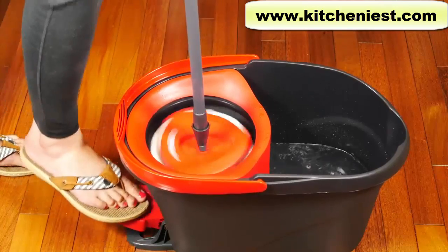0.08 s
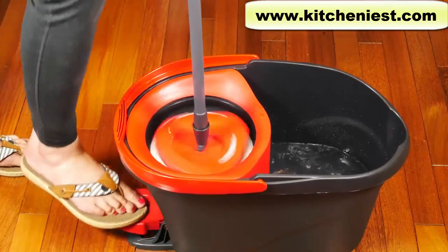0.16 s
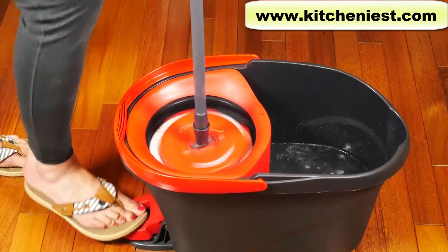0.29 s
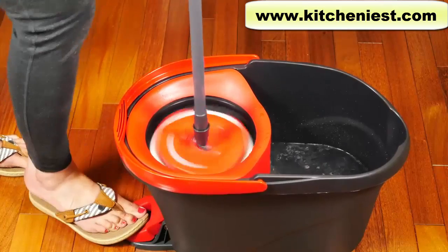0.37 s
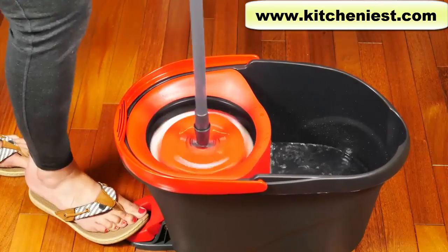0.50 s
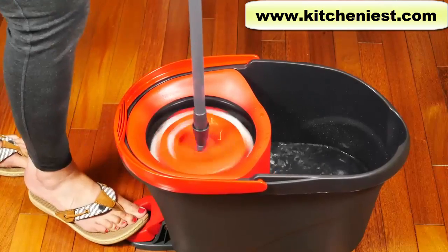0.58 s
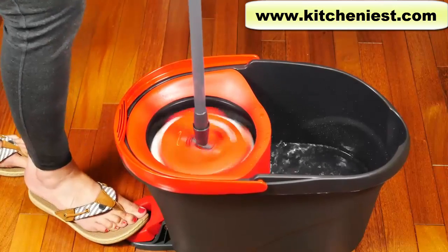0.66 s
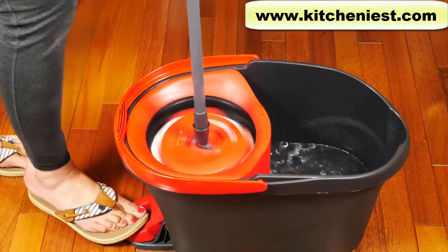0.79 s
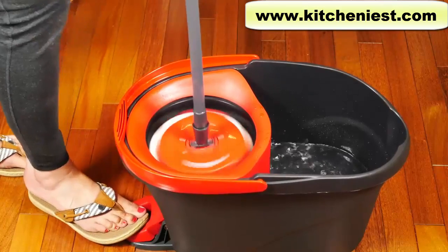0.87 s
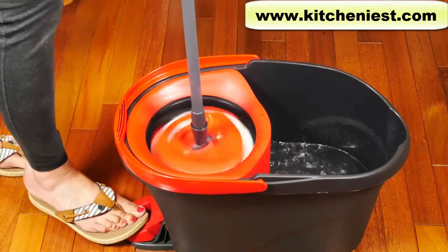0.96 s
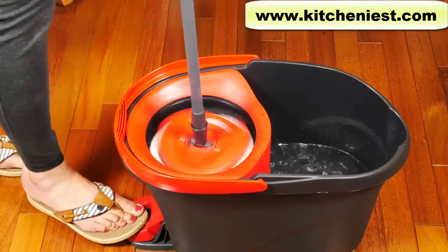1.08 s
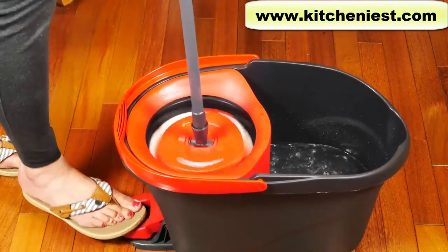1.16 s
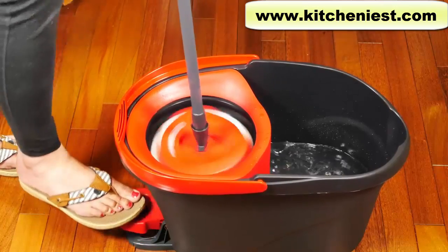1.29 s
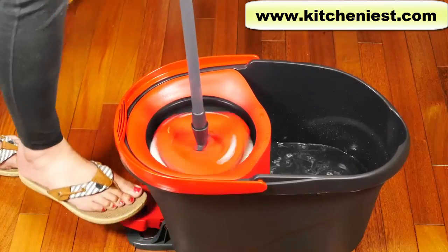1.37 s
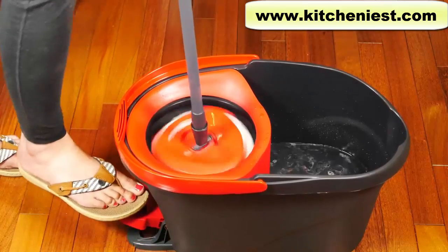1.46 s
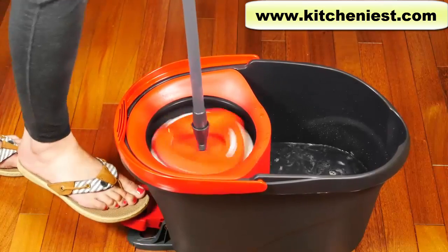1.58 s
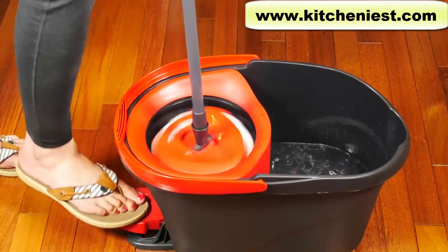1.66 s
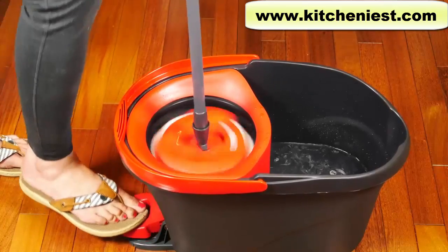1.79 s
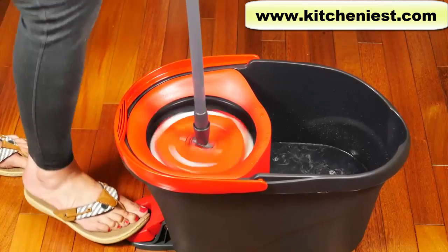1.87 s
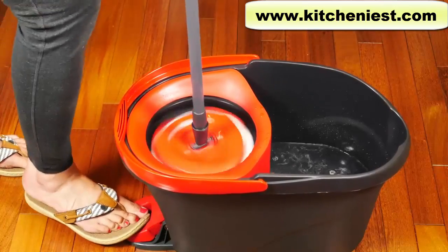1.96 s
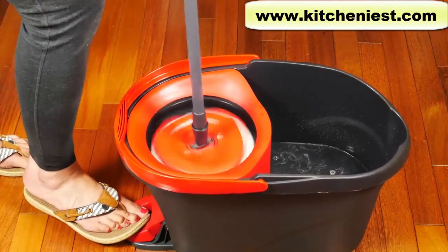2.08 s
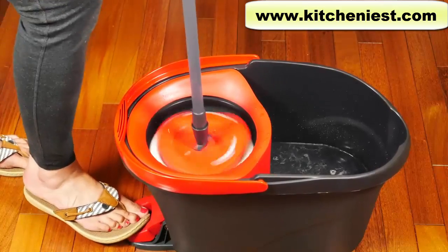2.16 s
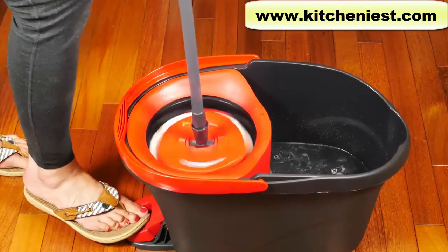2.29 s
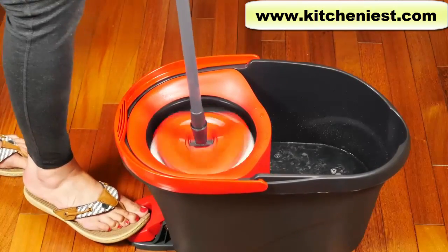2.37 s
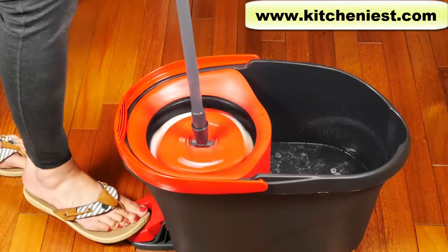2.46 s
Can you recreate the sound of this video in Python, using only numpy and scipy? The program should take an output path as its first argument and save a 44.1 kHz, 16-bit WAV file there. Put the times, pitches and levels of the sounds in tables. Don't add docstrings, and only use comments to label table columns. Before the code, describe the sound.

A spin-mop bucket is pumped by foot. From 0.13 seconds plastic teeth chatter faster and louder, ending near 0.37 in a hard, bouncing clack with rattle and low floor thump. The basket whirrs throughout with throbbing and faint water hiss. From 1.1 to 1.5 the rising pedal scrapes with small squeaks. Fainter chatter from 1.7 ends in a bright clack at 1.91; whirring continues, with a faint knock near 2.16.

```python
import sys
import numpy as np
from scipy import signal
from scipy.fft import rfft, irfft
from scipy.io import wavfile
from scipy.ndimage import uniform_filter1d

SR = 44100
rng = np.random.default_rng(int(sys.argv[2]) if len(sys.argv) > 2 else 0)


def convert_level_to_amplitude(level_db):
    exponent = np.asarray(level_db, float) / 20
    return 10 ** exponent


def pcm_store(signal):
    levels = np.round(np.clip(np.atleast_2d(signal), -1, 1) * 32767)
    wavfile.write(sys.argv[1], SR, levels.astype(np.int16).T)


N = 110250

# start in seconds, level in dB.
TOOTH_BLOWS = [(.132, -32), (.149, -32), (.166, -30), (.183, -26), (.199, -24), (.215, -23), (.229, -22),
               (.244, -24), (.257, -22), (.270, -24), (.282, -22), (.294, -22), (.305, -22), (.316, -20),
               (.327, -20), (.337, -17), (.347, -20), (.357, -18), (1.714, -35), (1.728, -34), (1.746, -33),
               (1.765, -34), (1.783, -34), (1.798, -35), (1.812, -32), (1.827, -32), (1.841, -31),
               (1.854, -29), (1.866, -28), (1.879, -22), (1.891, -23)]
# start in seconds, level in dB.
GEAR_KNOCKS = [
    (0.095, -35),
    (.766, -36.5),
    (.806, -34),
    (0.89, -40),
    (.932, -34),
    (1.17, -34.5),
    (1.207, -35),
    (1.615, -36),
]
# start in seconds, peak in dB, brightness in dB, thump in dB.
STOP_BLOWS = [(.229, -27, 4, -23), (0.3624, -6, 6.5, -15.5), (0.3641, -4.5, -1, -33),
              (0.3815, -3.5, -3, -28), (.368, -11, 5, -25), (0.3748, -10.5, -4, -13),
              (1.9024, -21.5, -1, -35), (1.9084, -5, 12.5, -21), (1.9099, -8, -3, -18),
              (1.9165, -15.5, -1.5, -30), (1.9327, -17, 0, -30), (1.929, -17, -4, -40),
              (2.164, -29, -2, -14)]
# start in seconds, joist level in dB, board level in dB.
FLOOR_THUMPS = [
    (0.366, -27.5, -29),
    (1.913, -22, -27.5),
]
# start in seconds, level in dB, decay in seconds.
SHAKEN_PARTS = [
    (0.362, -22.5, 0.043),
    (0.381, -24.5, 0.0067),
    (1.9022, -23, 0.009),
    (1.906, -25, 0.021),
    (1.927, -27.5, 0.015),
]

# frequency in Hz, level in dB, T60 in seconds.
PEDAL_MODES = [(370, -11, 0.0073), (458, -5.5, 0.023), (620, -7.5, 0.015), (809, -4.5, 0.031),
               (979, 0.5, 0.019), (1308, -10, 0.036), (1570, -8, 0.019), (2945, -3, 0.025)]
STOP_MODES = [(369.2, 0, 0.067), (479, -13.5, 0.034), (840, -18.5, 0.02), (1062, -0.5, 0.039),
              (1243, -11, 0.036), (1480, -6.5, 0.029), (1852, -8, 0.025), (2130, -14, .012),
              (2586, -9, 0.033), (2877, 0, 0.025), (3320, -6, 0.0089), (3520, -9.5, 0.022),
              (4820, -10, 0.012), (5170, -16, 0.019)]
FLOOR_MODES = [(27.85, -5, 1), (48.6, -15, 0.15), (59.3, -8, 1), (105.3, 0.5, 0.32), (175, -18, .06)]
# centre in Hz, width in Hz, level in dB.
BUCKET_PEAKS = [(423, 84, 5.5), (815, 54, 2.5), (1006, 95, -2), (1405, 320, -3.5), (1940, 630, -10),
                (2594, 255, -11), (4760, 430, -21)]
FREEWHEEL_PEAKS = [(430, 58, 3), (563, 81, 5.5), (806, 42, 3.5), (1040, 76, 7), (1500, 38, 8.5),
                   (2000, 250, -8), (2505, 83, -2), (4960, 810, -3.5)]
SHAKEN_PEAKS = [(373, 55, 2), (1080, 260, -7.5), (1515, 105, -1.5), (1840, 83, -8.5), (2900, 260, -2),
                (4700, 360, -9)]
JOIST_PEAKS = [(25.8, 11.5, 2.5), (55.3, 1.6, 4), (104, 7.9, -7)]
# frequency in Hz, level in dB.
HISS_SPECTRUM = [(60, -24), (110, -11.5), (250, -9.5), (1000, -11), (2700, -16.5), (3700, -22),
                 (7600, -23.5), (10500, -34), (15500, -36)]
SCRAPE_SPECTRUM = [(88, -41), (150, -6.5), (274, -10), (1510, -9), (2060, -15), (8830, -20.5), (15500, -61)]
SHAKE_SPECTRUM = [(200, -17), (400, 2), (1000, 2.5), (2800, 8.5), (3900, 3), (5800, -11.5), (9000, -14),
                  (11000, -32)]
RUMBLE_SPECTRUM = [(4.7, -21), (8.0, 0), (41, -7.5), (66, -6), (90, -28), (120, -44), (200, -120)]
AIR_SPECTRUM = [(60, -24), (440, -8.5), (1500, -31), (9000, -31), (10500, -42), (14000, -33.5),
                (16000, -64)]
MIC_RESPONSE = [(20, -2), (9000, 4), (10500, 14), (12000, -2), (15000, -24), (16000, -30)]

# time in seconds, speed in turns per second, whirr in dB, wobble in dB,
# hiss of flung water in dB.
BASKET_SPIN = [(0, 19, -39.5, -65, -53), (.12, 13.4, -54, -48, -55), (.33, 21, -39, -36.5, -37),
               (.52, 12.6, -47, -44.5, -42.5), (.62, 20.8, -48.5, -45, -42.5), (.8, 14.6, -45, -40, -45.5),
               (1.06, 15.4, -46, -37.5, -47.5), (1.12, 16, -46.5, -42.5, -49),
               (1.45, 12, -49.5, -54, -52.5), (1.57, 14.4, -55, -61, -52.5), (1.62, 16, -46, -55, -60),
               (1.69, 12.6, -49.5, -48, -58), (1.88, 17.5, -44.5, -44, -43.5), (2.05, 15.8, -45, -45, -44),
               (2.25, 15.1, -45.5, -38.5, -48), (2.4, 16.2, -47.5, -45, -49.5), (2.5, 16, -47, -50, -49.5)]
# time in seconds, scrape level in dB.
PEDAL_RISE = [
    (1.1, -63),
    (1.14, -46.5),
    (1.18, -38),
    (1.23, -41.5),
    (1.28, -39),
    (1.38, -41),
    (1.45, -43),
    (1.48, -52),
    (1.6, -70),
]
# start in seconds, length in seconds, level in dB.
GUIDE_RUBS = [
    (0.176, 0.21, -51),
    (1.712, 0.084, -57),
    (1.86, 0.047, -47.5),
    (2.3, .1, -60),
    (2.45, .06, -67),
    (2.03, 0.091, -67),
]
# start in seconds, length in seconds, level in dB.
AXLE_SQUEAKS = [
    (1.13, 0.026, -47.5),
    (1.24, 0.056, -43),
    (1.37, 0.097, -52.5),
    (1.6, 0.074, -53.5),
]
# peak in seconds, level in dB, rise in seconds, fall in seconds.
SPRAY_BURSTS = [
    (.45, -52, 0.12, 0.077),
    (.498, -56, .002, 0.028),
    (.83, -53.5, 0.0052, 0.011),
]


def rack():
    start, db = np.transpose(TOOTH_BLOWS)
    push = uniform_filter1d(blows(start, db, scatter_s=0.0061, scatter_db=-23), size=12)
    start, db = np.transpose(GEAR_KNOCKS)
    soft = uniform_filter1d(blows(start, db, scatter_s=0.011, scatter_db=-12), size=24)
    teeth = convert_level_to_amplitude(0.5) * shell(ring(push, PEDAL_MODES, 0.91))
    return teeth + convert_level_to_amplitude(-4.5) * shell(ring(soft, PEDAL_MODES, 0.92))


def clacks():
    start, peak, bright, thump = np.transpose(STOP_BLOWS)
    crackle_db = -21
    dull = uniform_filter1d(blows(start, peak - bright, 0.0041, crackle_db), size=10)
    sharp = blows(start, peak + bright, 0.00077, crackle_db)
    low = uniform_filter1d(blows(start, peak + thump, 0.0016, crackle_db), size=24)
    body = convert_level_to_amplitude(-15) * ring(dull + convert_level_to_amplitude(-7.5) * sharp, STOP_MODES)
    click = convert_level_to_amplitude(3.5) * uniform_filter1d(uniform_filter1d(sharp, size=4), size=3)
    return body + click + convert_level_to_amplitude(10.5) * shell(ring(low, PEDAL_MODES, 0.76))


def shakes():
    t = np.arange(N) / SR
    env = sum(convert_level_to_amplitude(db) * (t > s) * np.exp(-np.maximum(t - s, 0) / decay) for s, db, decay in SHAKEN_PARTS)
    rattle = env * grit(1400, 2.3)
    tone = colour(rattle, SHAKE_SPECTRUM) + convert_level_to_amplitude(-3.0) * peaks(rattle, SHAKEN_PEAKS)
    return convert_level_to_amplitude(-3.0) * rms(rattle) * tone


def thumps():
    start, joist_db, board_db = np.transpose(FLOOR_THUMPS)
    joist = uniform_filter1d(blows(start, joist_db, .004, -60), size=150)
    board = uniform_filter1d(blows(start, board_db, .004, -60), size=150)
    return ring(joist, FLOOR_MODES[:1]) + ring(board, FLOOR_MODES[1:])


def basket():
    turn = np.cumsum(curve(BASKET_SPIN, 1)) / SR
    turn = turn - turn[int(.925 * SR)]
    throb_db = 1.1 * np.cos(2 * np.pi * (turn - .2)) + 1.3 * walk(10.12)
    whirr_db = curve(BASKET_SPIN, 2) + throb_db + 2.2 * walk(30.16)
    whirr = shell(peaks(grit(900, 2.66), BUCKET_PEAKS)) * convert_level_to_amplitude(whirr_db)
    hiss_db = curve(BASKET_SPIN, 4) + throb_db / 2 + walk(25.7)
    hiss = colour(grit(4000, 2.4), HISS_SPECTRUM) * convert_level_to_amplitude(hiss_db)
    harmonics = [(1, -4.0, -1.95), (2, 1, -0.33), (3, -4.0, 0.057)]  # number, dB, phase in radians
    wobble = -sum(convert_level_to_amplitude(db) * np.cos(2 * np.pi * k * turn + phase) for k, db, phase in harmonics)
    return whirr + hiss, wobble * convert_level_to_amplitude(curve(BASKET_SPIN, 3))


def freewheel():
    rise_db = curve(PEDAL_RISE, 1)
    rasp = convert_level_to_amplitude(0.25 * (rise_db + 35)) * colour(grit(5000, 1.3), SCRAPE_SPECTRUM)
    scrape = unit(peaks(grit(1500, 2.2), FREEWHEEL_PEAKS) + rasp) * convert_level_to_amplitude(rise_db + 0.52 * walk(30.18))
    rub = peaks(grit(1100, 1.8), [(4760, 300, 0.5), (2740, 530, 0.5), (5050, 270, 2.0)])
    rub = rub * gate(GUIDE_RUBS, size=600) * convert_level_to_amplitude(3.3 * walk(38.75))
    squeak = peaks(rng.standard_normal(N), [(1475, 23, 0)]) * gate(AXLE_SQUEAKS, size=900)
    return scrape + rub + squeak


def spray():
    t = np.arange(N) / SR
    env = sum(convert_level_to_amplitude(db) * np.exp(np.minimum((t - s) / rise, (s - t) / fall)) for s, db, rise, fall in SPRAY_BURSTS)
    return env * colour(grit(4400, 3.0), [(5000, -40), (10500, -13), (12500, 4), (14500, 1), (15600, -9)])


def room(x):
    t = np.arange(int(.6 * SR)) / SR
    noise = rng.standard_normal(len(t))
    low = signal.lfilter(*signal.butter(1, 2500, fs=SR), noise)
    low_t60_s, high_t60_s = 0.48, 0.35
    tail = low * convert_level_to_amplitude(-60 * t / low_t60_s) + (noise - low) * convert_level_to_amplitude(-60 * t / high_t60_s)
    tail = tail * np.minimum(t / 0.0048, 1)
    return convert_level_to_amplitude(-5.5) * signal.fftconvolve(x, tail / np.sqrt(np.sum(tail ** 2)))[:N]


def background():
    rumble = convert_level_to_amplitude(-43.5 + 2.2 * walk(12.44)) * colour(rng.standard_normal(N), RUMBLE_SPECTRUM)
    air = convert_level_to_amplitude(-52) * colour(rng.standard_normal(N), AIR_SPECTRUM)
    return rumble + air + convert_level_to_amplitude(-52) * peaks(rng.standard_normal(N), JOIST_PEAKS)


def blows(times, db, scatter_s, scatter_db):
    length = 900
    x, n = np.zeros(N + length), np.arange(length)
    for start, level in zip(times, db):
        blow = convert_level_to_amplitude(scatter_db) * rng.standard_normal(length) * np.exp(-n / SR / scatter_s)
        blow[0] = 1
        i = int(start * SR)
        x[i:i + length] += convert_level_to_amplitude(level) * blow
    return x[:N]


def grit(per_s, spread_db):
    chance, sign, size = rng.random((3, N))
    return unit((chance < per_s / SR) * np.sign(sign - .5) * convert_level_to_amplitude(-spread_db * np.log(size + .02)))


def ring(x, modes, flip=-1):
    total = 0
    for k, (hz, db, t60) in enumerate(modes):
        pole = np.exp((2j * np.pi * hz - np.log(1000) / t60) / SR)
        total = total + flip ** k * convert_level_to_amplitude(db) * signal.lfilter([1], [1, -pole], x).imag
    return total


def peaks(x, table):
    return unit(ring(x, [(hz, db + 20 * np.log10(width), 2.6 / width) for hz, width, db in table]))


def shell(x):
    return signal.sosfilt(signal.butter(3, 328, "high", fs=SR, output="sos"), x)


def colour(x, points):
    hz = np.maximum(np.fft.rfftfreq(N, 1 / SR), 1)
    at_hz, db = np.transpose(np.array(points, float))
    gain_db = np.interp(np.log(hz), np.log(at_hz), db, left=-60, right=-90)
    return unit(irfft(rfft(x) * convert_level_to_amplitude(gain_db), N))


def gate(rows, size):
    t = np.arange(N) / SR
    return uniform_filter1d(sum(convert_level_to_amplitude(db) * ((t > s) & (t < s + d)) for s, d, db in rows), size=size)


def curve(rows, col):
    rows = np.array(rows, float)
    return np.interp(np.arange(N) / SR, rows[:, 0], rows[:, col])


def walk(rate):
    k = int(SR / rate)
    steps = np.repeat(rng.standard_normal(N // k + 1), k)
    return unit(uniform_filter1d(uniform_filter1d(steps, k), k)[:N])


def rms(x):
    return np.sqrt(np.mean(x ** 2))


def unit(x):
    return x / rms(x)


def scene():
    whirr, wobble = basket()
    hits = clacks() + shakes()
    hits = colour(hits, MIC_RESPONSE) * rms(hits)
    near, teeth = hits + whirr + freewheel(), rack()
    mid = near + teeth + room(near + convert_level_to_amplitude(-3) * teeth)
    mid = mid + thumps() + wobble + spray() + background()
    side_spectrum = [(20, -30), (150, 10), (1000, 16.0), (8000, -12), (12000, -2), (15500, 1)]
    side = convert_level_to_amplitude(-71) * colour(rng.standard_normal(N), side_spectrum) + convert_level_to_amplitude(-36.5) * room(mid)
    return np.array([mid + side, mid - side])


def top_cut(x):
    return signal.sosfilt(signal.butter(12, 16230, fs=SR, output="sos"), x)


def record(dry):
    peak = 1.4
    rounded = peak * np.tanh(dry / peak)
    mix = signal.sosfiltfilt(signal.butter(8, 15500, fs=SR, output="sos"), rounded)
    return top_cut(mix)


dry = scene()
out = record(dry)
pcm_store(out)
```